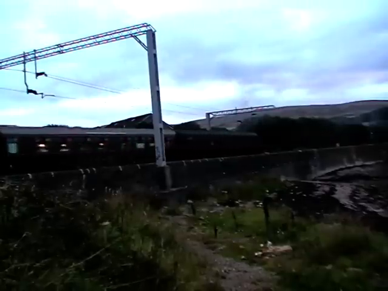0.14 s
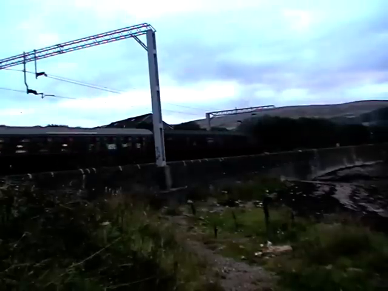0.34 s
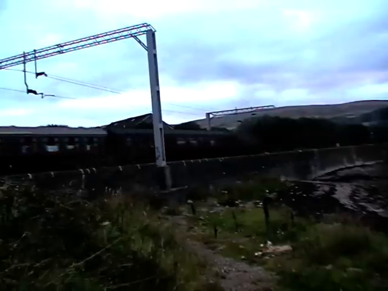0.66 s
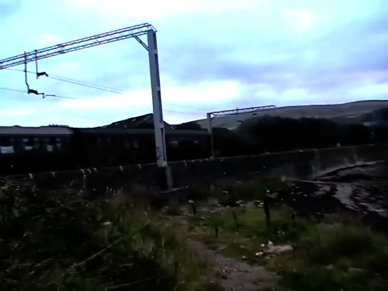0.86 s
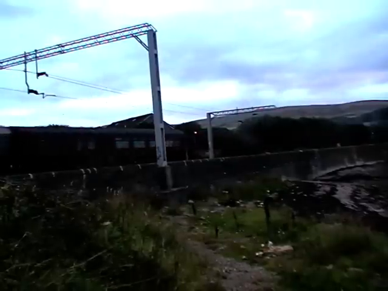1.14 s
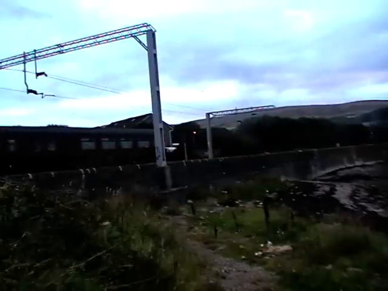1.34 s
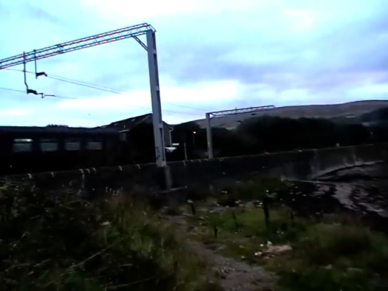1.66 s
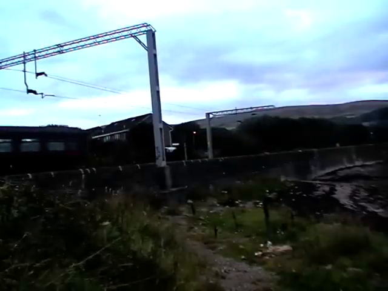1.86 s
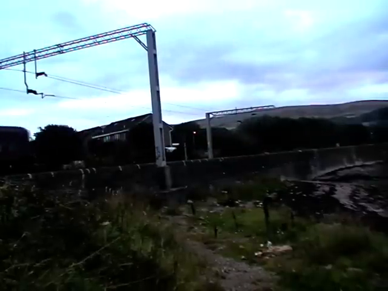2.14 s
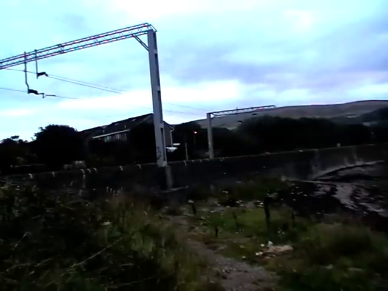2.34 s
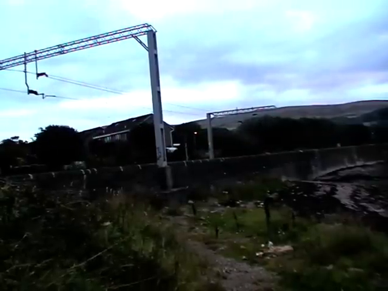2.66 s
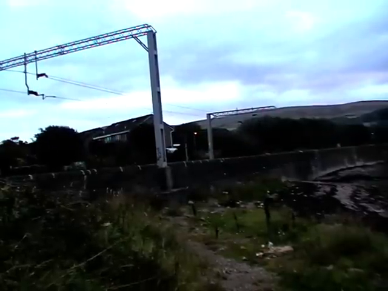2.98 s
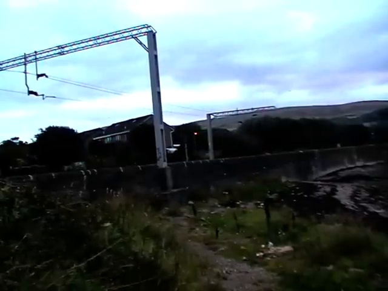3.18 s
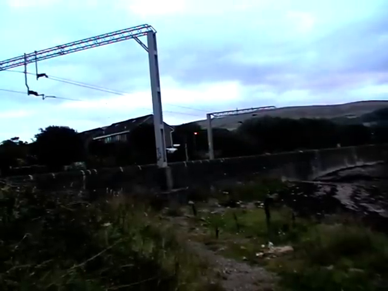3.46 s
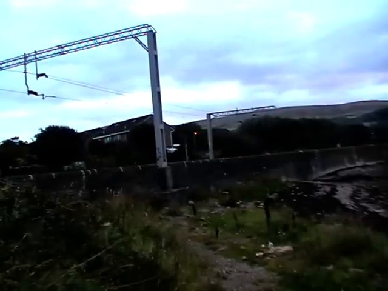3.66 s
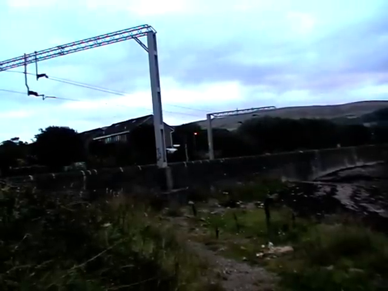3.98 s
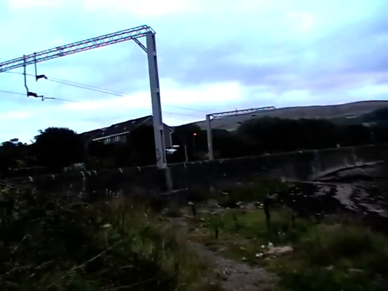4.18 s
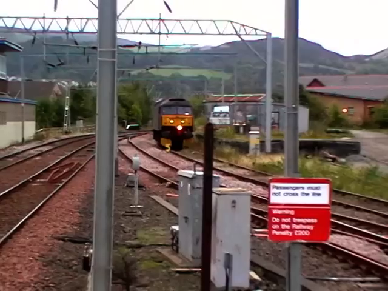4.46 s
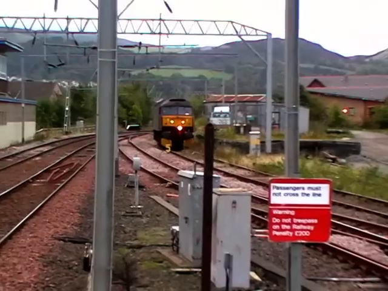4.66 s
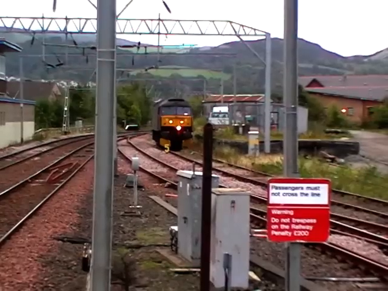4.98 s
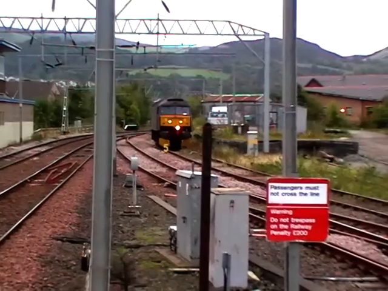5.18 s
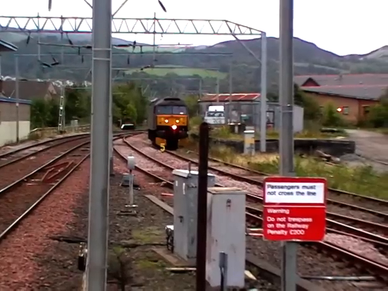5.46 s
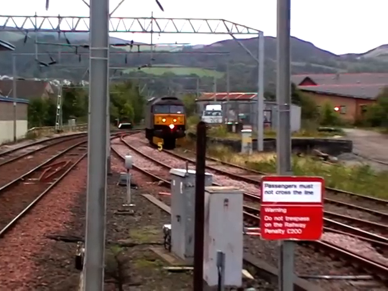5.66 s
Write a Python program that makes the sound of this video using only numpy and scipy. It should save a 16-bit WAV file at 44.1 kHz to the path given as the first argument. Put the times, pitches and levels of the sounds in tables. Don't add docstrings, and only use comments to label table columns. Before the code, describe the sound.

A trackside stereo microphone catches a passing train's tail: rough wheel rumble, gritty hiss, ringing wheels and double bangs over joints, with fainter clatter from along the line. The sound recedes over about four seconds and drops out briefly. The scene then switches abruptly to a calm open rail yard, where a far diesel engine hums and gently pulses, steady and low, with faint electronic whine.

```python
import sys
import numpy as np
from scipy import signal
from scipy.fft import irfft
from scipy.io import wavfile
from scipy.ndimage import uniform_filter1d

SR = 44100
rng = np.random.default_rng(int(sys.argv[2]) if len(sys.argv) > 2 else 0)


def inscribe(sig):
    pcm = np.round(np.clip(np.atleast_2d(sig).T, -1, 1) * 32767)
    wavfile.write(sys.argv[1], SR, pcm.astype(np.int16))


def linear_from_db(decibels):
    return 10 ** (np.asarray(decibels, float) / 20)


N = 256653
TIME = np.arange(N) / SR

# t/s, loss with distance as level/dB
DISTANCE = [(0.0, 1), (0.3, 0), (0.55, -2), (0.95, -1), (1.26, 0), (1.6, -1), (1.99, -1.5), (2.28, -1),
            (2.55, -3), (2.8, -3.5), (3.04, -4.5), (3.38, -2.5), (3.6, -8), (3.8, -11), (4.05, -11),
            (4.2, -14.5), (4.38, -19.5)]
# f/Hz, level/dB
RUMBLE_COLOUR = [(12, -46), (20, -40), (80, -4), (210, -2.5), (258, -1), (353, -0.5), (528, -7.5),
                 (700, -11.5), (910, -30), (1540, -120)]
ROAR_COLOUR = [(240, -18.5), (400, -0.5), (528, -1), (769, 3), (1150, -9.5), (1500, -57), (2530, -120)]
GRIND_COLOUR = [(590, -27), (1000, -2), (1130, -1.5), (1300, 1), (1600, -6.5), (1780, -2), (2770, -11),
                (2990, -26), (3200, -19), (4160, -62), (7040, -120)]
HISS_COLOUR = [(2000, -21), (2900, 1.5), (3750, -2.5), (4300, -6), (6700, -13), (9200, -26.5),
               (11200, -36.5), (13500, -41), (15000, -81)]
# (level/dB when near, share of the distance loss); treble fades first
RUMBLE_LEVEL, ROAR_LEVEL, GRIND_LEVEL, HISS_LEVEL = (-22, 0.42), (-21.5, 0.33), (-22.5, 1), (-31, 1.27)
FLOOR_LEVEL, RAIL_LEVEL = (-24, 0.7), (-34, 0.65)
FIELD_HISS_DB = -47.5

# middle t/s, half length t/s, f/Hz, level/dB
SQUEALS = [(.1, 0.09, 1366, -33), (.42, .06, 1440, -32), (.56, 0.062, 1852, -28.5),
           (0.713, 0.064, 1800, -29.5), (0.724, 0.044, 3030, -37), (0.857, 0.082, 1400, -28.5),
           (1.008, .03, 3790, -40), (1.136, 0.065, 1293, -25), (1.295, 0.086, 1240, -26.5),
           (1.326, 0.028, 2450, -28), (1.46, 0.03, 1250, -20.5), (1.654, 0.17, 1383, -28),
           (1.62, 0.076, 1910, -33.5), (1.8, 0.058, 1870, -30.5), (2.083, .05, 1343, -26),
           (2.412, 0.037, 1258, -28.5), (3.648, .025, 3050, -38), (3.65, .02, 3850, -39),
           (2.29, 0.048, 1800, -32), (2.563, 0.056, 1790, -30), (3.06, 0.046, 1780, -35),
           (3.29, 0.043, 1775, -31), (3.46, 0.041, 1765, -32), (3.67, .04, 1738, -34),
           (4.102, .035, 1735, -33.5)]
# middle t/s, half length t/s, level/dB
SCRAPES = [
    (2.3, 0.087, -40),
    (3.31, .04, -40),
    (4.05, .1, -52),
]
SQUEAL_WIDTH_HZ, SCRAPE_HZ, SCRAPE_WIDTH_HZ = 46, 5900, 740
RIM_HZ, RIM_SPREAD, RIM_AFTER_S, RIM_HALF_S, RIM_DB = 3790, 0.018, 0.012, 0.026, -24

# t/s, crack level/dB, weight level/dB, clank f/Hz
NEAR_JOINT = [
    (0.375, -8, -8.5, 1240),
    (0.5102, -7, -8.5, 1390),
    (0.695, -10, -8.5, 1270),
    (0.835, -7.5, -8.5, 1340),
    (1.452, -8.5, -9.5, 1236),
    (1.5912, -8, -10.5, 1390),
    (1.7765, -6, -10, 1400),
    (1.915, -5.5, -9, 1290),
    (2.5404, -8, -10, 980),
    (2.6766, -8, -11, 1170),
]
# t/s, crack level/dB, weight level/dB, clank f/Hz
FAR_JOINTS = [(0.0643, -20, -24, 1320), (0.243, -15.5, -14, 1260), (0.3588, -12.5, -15, 1030),
              (0.9945, -14.5, -17, 1030), (1.1099, -16, -15.5, 1310), (1.1497, -21, -21, 1450),
              (1.182, -17, -15.5, 864), (1.2173, -25, -15, 1270), (1.319, -19, -16.5, 1230),
              (1.5516, -14.5, -23, 1110), (2.0836, -14.5, -16.5, 814), (2.2071, -14.5, -17, 1060),
              (2.2679, -12.5, -12.5, 810), (2.3182, -18, -17, 816), (2.351, -17.5, -15, 1330),
              (2.4023, -13, -13, 1190), (2.7367, -16.5, -20, 860), (2.8756, -26, -15, 875),
              (3.034, -10.5, -15, 1020), (3.169, -13.5, -16, 810), (3.2584, -24, -18, 1660),
              (3.2897, -15.5, -19, 1760), (3.318, -15, -26, 896), (3.431, -16.5, -17, 1710),
              (3.5025, -17.5, -17.5, 802), (3.6423, -21, -13.5, 920), (3.9447, -31, -19.5, 802),
              (4.014, -32, -17.5, 950), (4.049, -30, -22, 921), (4.15, -22, -17, 990)]
# (thud dB and clank dB over the weight, lead-in dB, treble limit Hz)
NEAR_MIX, FAR_MIX = (-1.5, 0.4, -10.5, 16500), (-3, 2.5, -10, 12000)
# f/Hz, level/dB
CRACK_COLOUR = [(900, -43), (1500, -7.5), (1860, -7.5), (2500, -8), (3800, -8.5), (4300, -13.5),
                (7000, -21.5), (10000, -36), (12500, -48), (14500, -66)]
# f/Hz, level/dB, time to fade by 60 dB as t/s
WHEEL_TONES = [(1270, -9, 0.21), (1390, -3, 0.31), (1800, -9, 0.33), (2465, -9.5, 0.56), (3100, -13.5, 0.7),
               (3810, -11, 0.11), (4400, -21, 0.12)]
THUD_HZ, THUD_WIDTH_HZ, CLANK_WIDTH_HZ, RATTLE_S = 248.8, 130, 785, 0.013
DULLING_HZ_PER_S = 660

# t/s, level/dB, f/Hz
KNOCKS = [
    (0.912, -17, 350),
    (1.219, -9.5, 960),
    (2.735, -8.5, 770),
    (2.883, -9.5, 380),
    (3.5, -7.5, 767),
]
# t/s, level/dB, f/Hz
CLICK = [
    (4.3186, -28.5, 3700),
]

# f/Hz, level/dB
DRONE_COLOUR = [(12, -65), (20, -39), (54, -10.5), (163, -9.5), (183, -18), (211, -7), (274, -6),
                (307, -6.5), (349, -26), (384, -9.5), (417, -11), (758, -1), (950, -4), (1240, -36),
                (2090, -120)]
WASH_COLOUR = [(700, -22), (950, -8), (1070, -8), (1210, -3), (1530, -13), (2050, -11), (2710, -18),
               (3010, -18.5), (4000, -30.5), (5210, -29), (7500, -38), (10000, -49), (14000, -60)]
DRONE_DB, WASH_DB, YARD_SWELL_DB = -37.5, -41.5, 0.25
CHUG_FIRST_S, CHUG_EVERY_S, CHUG_DB, CHUG_HALF_S = 4.739, 0.3, -43.5, 0.033

# f/Hz, peak level/dB
WHINES = [(10499, -79), (12000, -74.5)]
# f/Hz, likeness 0-1, left lead in radians, left over right level/dB
TRAIN_PORTS = [(45, .98, -.6, 1.2), (130, .99, -.3, .2), (320, .992, .05, -1), (700, .97, .55, .5),
               (900, .95, .7, 2.5), (1200, .94, .6, 4.7), (1900, .92, .4, 5.3), (2600, .89, .25, 5.3),
               (5000, .91, .2, 4.7), (7000, .88, .2, 2.3), (9000, .76, .2, -1), (10700, .35, 1.4, -5),
               (12300, .5, 2.4, -1)]
YARD_PORTS = [(45, .98, -.5, 0), (200, .985, -.2, -1), (700, .985, 0, -1), (1500, .92, 0, 0),
              (7000, .87, -.05, -.5), (9000, .64, 0, 0), (11000, .35, 0, 0)]
FADE_OUT_S, FADE_IN_S, END_FADE_S = (4.36, 4.378), (4.436, 4.445), 0.004


def evened(x):
    return x / np.sqrt(np.mean(x ** 2) + 1e-20)


def read(points, hz):
    f, value = np.transpose(points)
    return np.interp(np.log(hz + 1), np.log(f + 1), value)


def distance_loss():
    return np.interp(TIME, *np.transpose(DISTANCE))


def away(level):
    near_db, share = level
    return linear_from_db(near_db + share * distance_loss())


def wander(per_s):
    t = TIME[::256]
    waves = [np.sin(2 * np.pi * (f * t + rng.random())) for f in per_s * np.geomspace(0.1, 1, 20)]
    return np.interp(TIME, t, evened(sum(waves)))


def resonate(x, hz, width):
    r = np.exp(-np.pi * width / SR)
    if np.isscalar(hz):
        return 2 * signal.lfilter([1 - r], [1, -r * np.exp(2j * np.pi * hz / SR)], x).real
    turn = np.exp(2j * np.pi * np.cumsum(hz) / SR)
    return 2 * (turn * signal.lfilter([1 - r], [1, -r], x / turn)).real


def resonate_twice(x, hz, width):
    return resonate(resonate(x, hz, width), hz, width)


def noise(colour, patchy_db, flicker_db, size):
    frames, hz = 4 * N // size + 5, np.fft.rfftfreq(size, 1 / SR)
    *z, patches = rng.standard_normal((frames, len(hz), 5)).T
    patches = uniform_filter1d(patches, size // 100, 0)
    patches = evened(uniform_filter1d(patches, 3000 // size, 1))
    flicker = evened(uniform_filter1d(rng.standard_normal(frames), 2500 // size))
    z = np.array([z[0] + 1j * z[1], z[2] + 1j * z[3]])
    z *= linear_from_db(read(colour, hz)[:, None] + patchy_db * patches + flicker_db * flicker)
    return evened(signal.istft(z, nperseg=size, noverlap=3 * size // 4)[1][:, :N])


def rolling_wheels():
    rumble = away(RUMBLE_LEVEL) * noise(RUMBLE_COLOUR, patchy_db=1.0, flicker_db=3.0, size=1024)
    roar = away(ROAR_LEVEL) * noise(ROAR_COLOUR, patchy_db=2.14, flicker_db=-0.7, size=512)
    grind = away(GRIND_LEVEL) * noise(GRIND_COLOUR, patchy_db=1.9, flicker_db=0.7, size=512)
    hiss_gain = np.hypot(away(HISS_LEVEL), linear_from_db(FIELD_HISS_DB))
    hiss = hiss_gain * noise(HISS_COLOUR, patchy_db=2.5, flicker_db=0.5, size=256)
    return rumble + roar + grind + hiss


def drumming_floors():
    body_hz = 300 + 15.7 * wander(8)
    boom = evened(resonate_twice(rng.standard_normal((2, N)), body_hz, 60))
    return away(FLOOR_LEVEL) * linear_from_db(1.5 * wander(6)) * boom


def singing_rail(rough):
    rail_hz = 1790 + 30 * wander(7)
    rail = evened(resonate_twice(rough, rail_hz, 170)) * np.interp(TIME, (2.0, 2.3), [0, 1])
    return away(RAIL_LEVEL) * linear_from_db(2.5 * wander(9)) * rail


def rubbing_rims(rough):
    rubs = [(*row, SQUEAL_WIDTH_HZ) for row in SQUEALS]
    for s, crack_db, *_ in NEAR_JOINT:
        hz = RIM_HZ * (1 + RIM_SPREAD * rng.standard_normal())
        rubs.append((s + RIM_AFTER_S, RIM_HALF_S, hz, crack_db + RIM_DB, 2 * SQUEAL_WIDTH_HZ))
    rubs += [(s, half, SCRAPE_HZ, db, SCRAPE_WIDTH_HZ) for s, half, db in SCRAPES]
    out = np.zeros((2, N))
    for s, half, hz, db, width in rubs:
        near = slice(max(round((s - 3 * half) * SR), 0), round((s + 3 * half) * SR))
        rub = evened(resonate_twice(rough[:, near], hz, 1.35 * width))
        late = TIME[near] - s
        swell = np.exp(-(late / np.where(late < 0, 0.74 * half, 1.73 * half)) ** 2)
        out[:, near] += linear_from_db(db) * rub * swell
    return out


def joint_blows():
    ahead = 2000
    out, t = np.zeros((2, N + 9000)), (np.arange(9000) - ahead) / SR
    late, hz = np.maximum(t, 0), np.fft.rfftfreq(512, 1 / SR)
    crack = np.fft.fftshift(irfft(linear_from_db(read(CRACK_COLOUR, hz)))) * np.hanning(512)
    crack /= np.linalg.norm(crack)
    hold = np.minimum(late / 0.0037, 1) / (1 + (late / RATTLE_S) ** 2.18)
    echoes = 0.34 * np.exp(-late / 0.034) * np.minimum(late / 0.017, 1)
    approach = np.exp(-abs(t) / 0.019)
    axles = [row + NEAR_MIX for row in NEAR_JOINT] + [row + FAR_MIX for row in FAR_JOINTS]
    for s, crack_db, weight_db, clank_hz, thud_db, clank_db, lead_db, air_hz in axles:
        thud_db, clank_db = weight_db + thud_db, weight_db + clank_db
        rattle, clank = rng.standard_normal((2, 2, len(t)))
        grit = linear_from_db(1.5 * uniform_filter1d(rng.standard_normal(len(t)), size=30) * 5.4)
        shape = hold * grit + echoes + linear_from_db(lead_db) * approach
        sound = linear_from_db(crack_db - 12.5) * signal.oaconvolve(rattle * shape, crack[None], "same")
        sound += linear_from_db(clank_db + 6.0) * resonate_twice(clank * shape, clank_hz, CLANK_WIDTH_HZ)
        push_hz = THUD_HZ * rng.uniform(0.97, 1.052)
        push = np.sin(2 * np.pi * push_hz * t + rng.uniform(0, 2 * np.pi, (2, 1)))
        thud = resonate(resonate(push * hold, THUD_HZ, 200), THUD_HZ, THUD_WIDTH_HZ)
        sound += linear_from_db(thud_db + 2.0) * thud
        sound += linear_from_db(thud_db + 12.5) * resonate_twice(clank[::-1] * shape, 141, 130)
        luck = rng.standard_normal((len(WHEEL_TONES), 2))
        for (f, db, t60), (detune, size) in zip(WHEEL_TONES, luck):
            tone_hz = f * (1 + 0.0143 * detune)
            tone = np.sin(2 * np.pi * tone_hz * t + rng.uniform(0, 2 * np.pi, (2, 1)))
            fading = linear_from_db(crack_db - 12.0 + db + 2.05 * size - 60 * late / t60)
            sound += fading * tone * np.minimum(late / 0.0063, 1)
        air = signal.butter(2, air_hz - DULLING_HZ_PER_S * s, fs=SR, output="sos")
        start = round((s - 0.002) * SR) - ahead
        out[:, start:][:, :len(t)] += signal.sosfilt(air, sound * signal.windows.tukey(len(t), 0.3))
    return out[:, :N]


def loose_part_knocks():
    out = np.zeros(N)
    for s, db, hz in KNOCKS:
        late = TIME - s - 0.0015
        after_ring = 0.25 * np.exp(-abs(late) / 0.0097) * np.clip(late / 0.002, 0, 1)
        shape = np.exp(-(late / 0.0014) ** 2) + after_ring
        out += linear_from_db(db + 1.0) * shape * np.cos(2 * np.pi * hz * late)
    return out


def small_click():
    s, db, hz = CLICK[0]
    late = np.maximum(TIME - s, 0)
    grit = 0.3 * rng.standard_normal(N) * (late > 0)
    return linear_from_db(db) * np.exp(-late / 0.00093) * (np.sin(2 * np.pi * hz * late) + grit)


def engine_chug():
    exhaust = evened(resonate_twice(rng.standard_normal((2, N)), 225, 60))
    exhaust = 0.4 * exhaust + 1.5 * np.sin(2 * np.pi * 228 * TIME)
    off = ((TIME - CHUG_FIRST_S) / CHUG_EVERY_S + 0.5) % 1 - 0.5
    return exhaust * linear_from_db(CHUG_DB) * np.exp(-(off * CHUG_EVERY_S / CHUG_HALF_S) ** 2)


def engine_hum():
    hum_hz = 810 + 25 * wander(5.5)
    hum = linear_from_db(-44) * evened(resonate_twice(rng.standard_normal((2, N)), hum_hz, 164))
    return hum + linear_from_db(-54) * np.sin(2 * np.pi * 1184 * TIME)


def yard():
    drone = linear_from_db(DRONE_DB) * noise(DRONE_COLOUR, patchy_db=-1.4, flicker_db=-0.4, size=1024)
    wash = linear_from_db(WASH_DB) * noise(WASH_COLOUR, patchy_db=0.4, flicker_db=0.0, size=512)
    chug = engine_chug()
    return (drone + wash + engine_hum()) * linear_from_db(YARD_SWELL_DB * wander(5)) + chug


def electronic_whine():
    return sum(linear_from_db(db) * np.sin(2 * np.pi * hz * TIME) for hz, db in WHINES)


def ports(pair, table, lean):
    hz, t, (a, b) = signal.stft(pair, SR, nperseg=1024)
    table_hz, *columns = np.transpose(table)
    same, lead, lean_db = (np.interp(hz, table_hz, column)[:, None] for column in columns)
    tilt = linear_from_db(lean_db * np.interp(t, TIME, lean) / 2) * np.exp(0.5j * lead)
    mid, off = np.sqrt((1 + same) / 2) * a, np.sqrt((1 - same) / 2) * b
    return signal.istft(np.array([(mid + off) * tilt, (mid - off) / tilt]), SR, nperseg=1024)[1][:, :N]


def scene():
    rough = rng.standard_normal((2, N))
    train = rolling_wheels() + drumming_floors() + singing_rail(rough) + rubbing_rims(rough)
    train += joint_blows() + loose_part_knocks()
    no_deep_bass = signal.butter(3, 30, "high", fs=SR, output="sos")
    lean = 1 - 0.0142 * distance_loss()
    train = ports(signal.sosfilt(no_deep_bass, train), TRAIN_PORTS, lean) + small_click()
    idle = ports(yard(), YARD_PORTS, np.ones(N))
    whine = electronic_whine()
    before = np.interp(TIME, FADE_OUT_S, [1, 0])
    after = np.interp(TIME, FADE_IN_S, [0, 1]) * np.minimum((TIME[-1] - TIME) / END_FADE_S, 1)
    return before ** 0.87 * (train + whine) + after ** 1.3 * (idle + linear_from_db(-3.5) * whine)


def drop_weak_treble(x):
    gaps_from_hz, usual_top_hz, under_loud_db, pass_top_db, whim_db = 9000, 12900, -69.5, -89.5, 3
    hz, t, z = signal.stft(x, SR, nperseg=1024)
    hz = hz[:512, None]
    power = abs(z[:, :512]) ** 2
    whim = np.repeat(rng.standard_normal((len(t), 64)), 2, 0)[:len(t)].T
    band = power.reshape(2, 64, 8, -1).max(2).mean(0)
    band = np.repeat(band * linear_from_db(2 * whim_db * whim), 8, 0)
    loud = uniform_filter1d(power.sum((0, 1)), 15) * linear_from_db(2 * under_loud_db)
    need = np.where(hz > usual_top_hz, np.maximum(loud, linear_from_db(2 * pass_top_db)), loud * (hz > gaps_from_hz))
    steady = abs(hz - WHINES[1][0]) < 90
    z[:, :512] *= (band > need) | steady
    return signal.istft(z, SR, nperseg=1024)[1][:, :N]


def low_pass(x):
    return signal.sosfilt(signal.butter(12, 14400, fs=SR, output="sos"), x)


def record(dry):
    hiss = linear_from_db(-72) * rng.standard_normal(dry.shape) * (abs(dry) > 0)
    mix = np.clip(drop_weak_treble(dry + hiss), -1, 1)
    return low_pass(mix)


dry = scene()
out = record(dry)
inscribe(out)
```